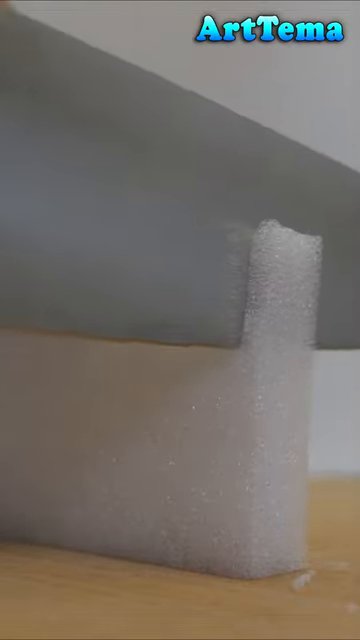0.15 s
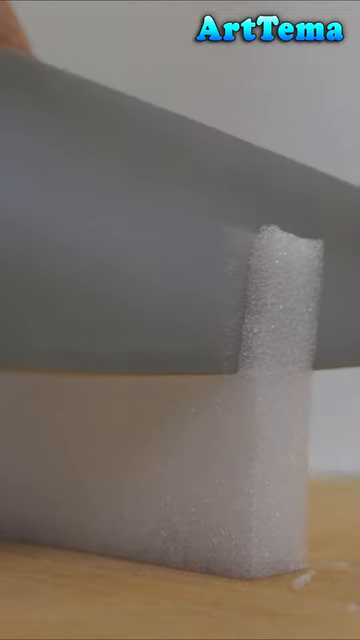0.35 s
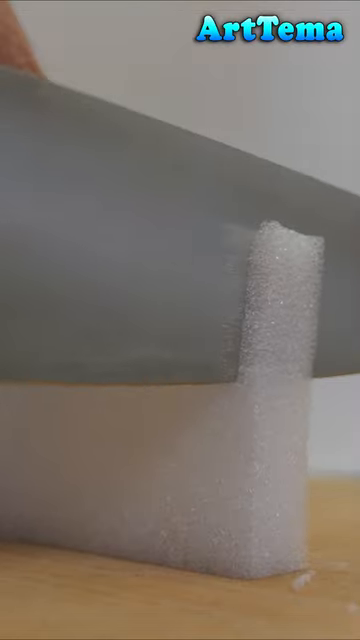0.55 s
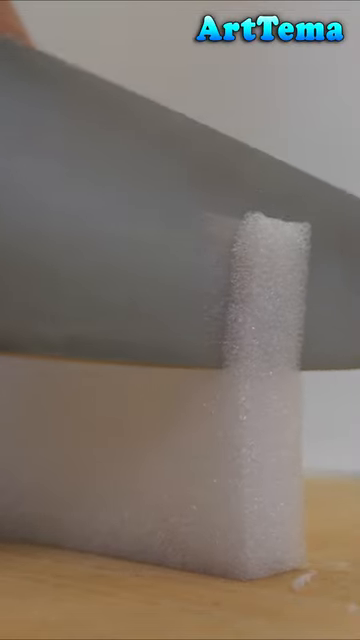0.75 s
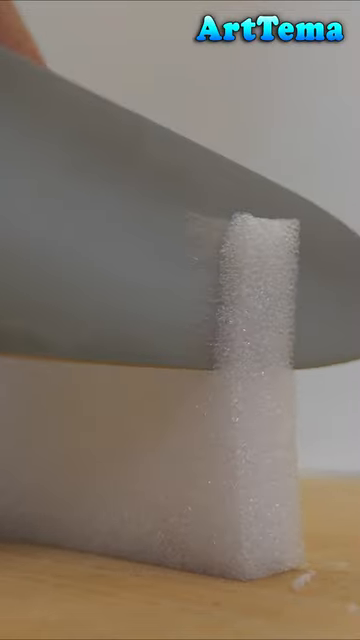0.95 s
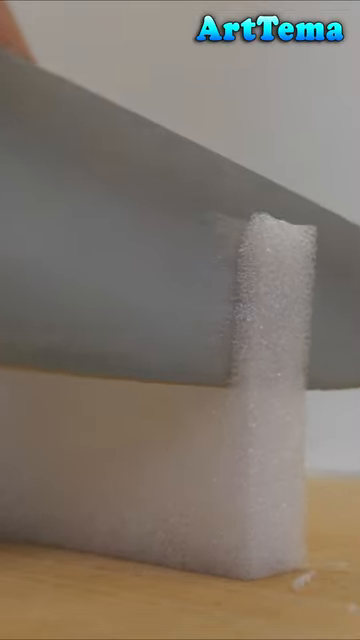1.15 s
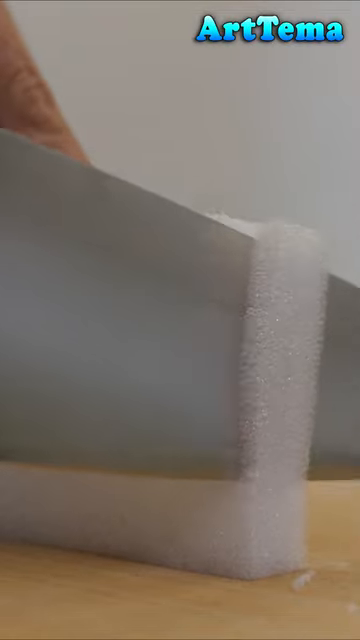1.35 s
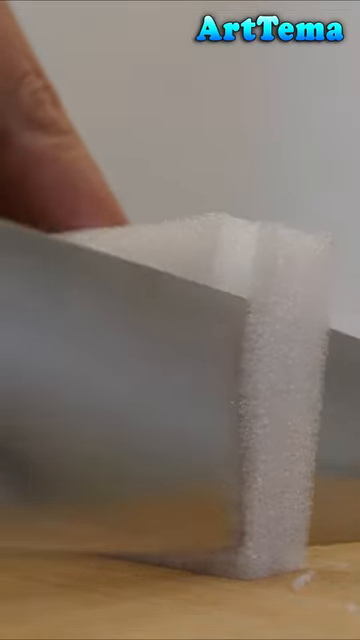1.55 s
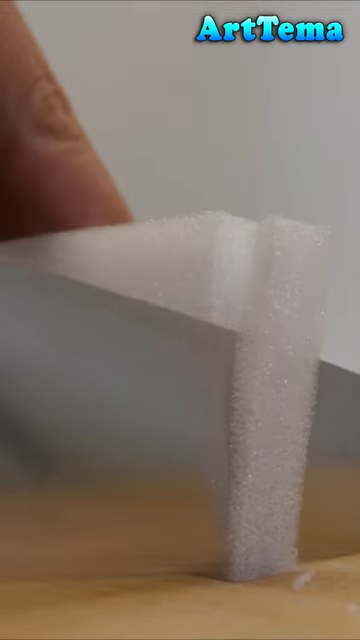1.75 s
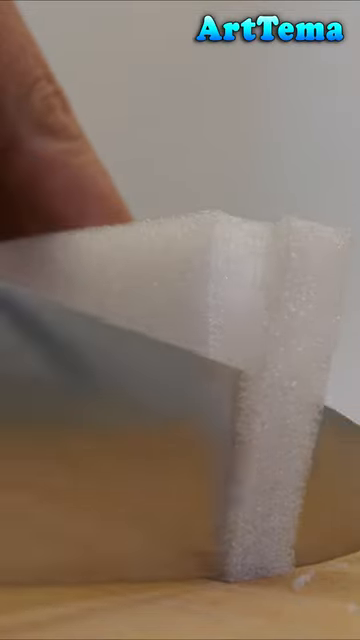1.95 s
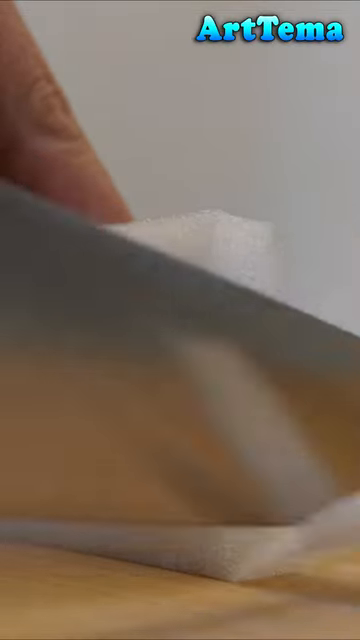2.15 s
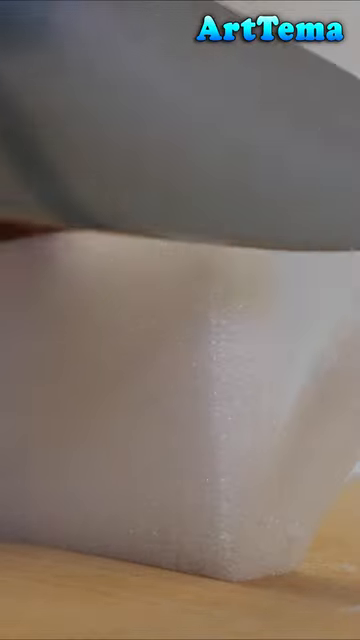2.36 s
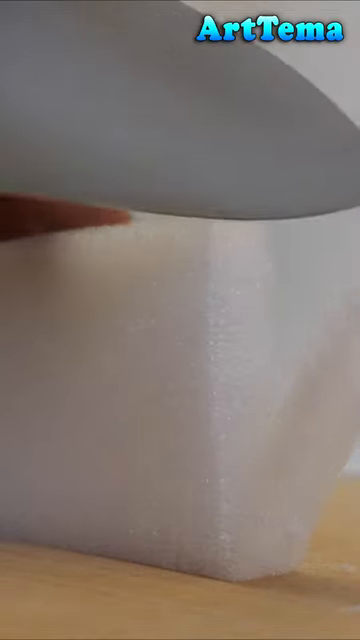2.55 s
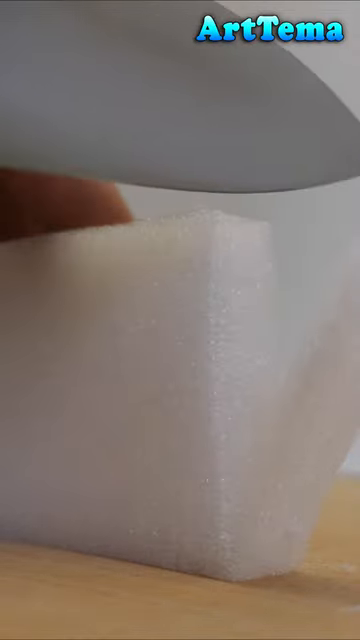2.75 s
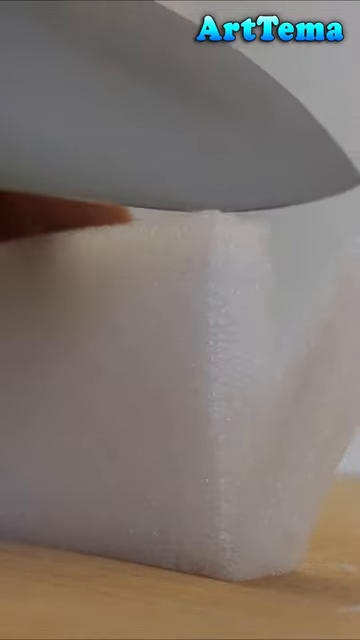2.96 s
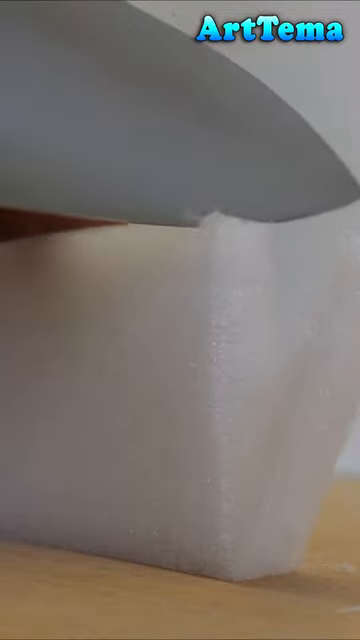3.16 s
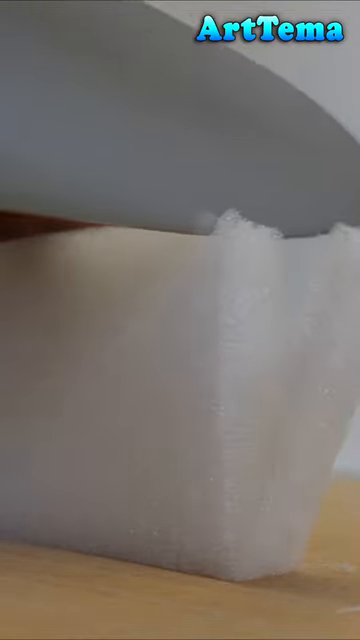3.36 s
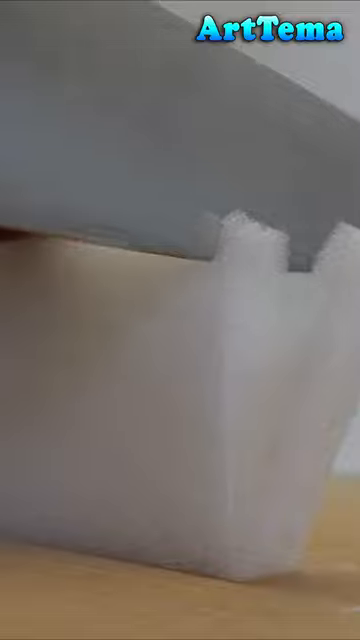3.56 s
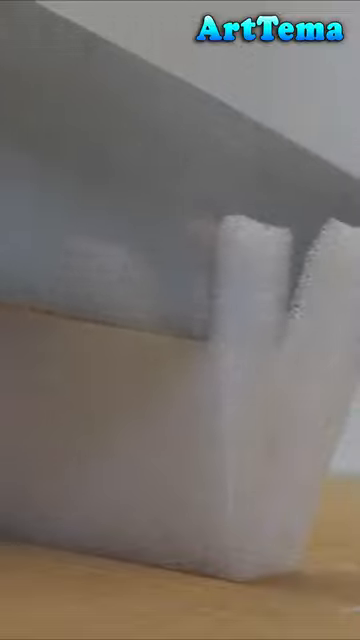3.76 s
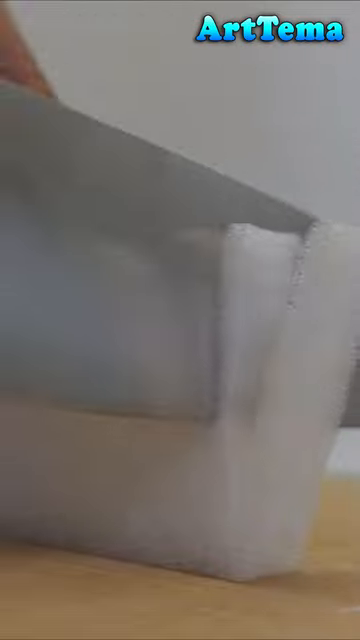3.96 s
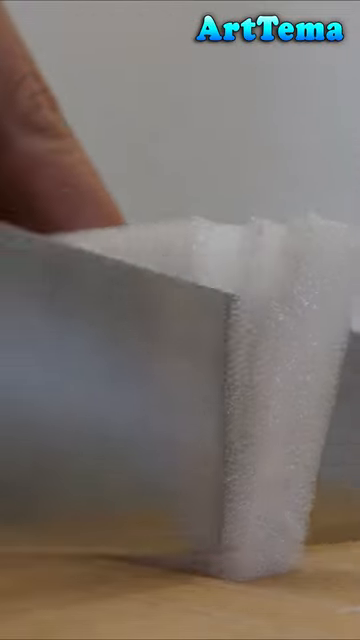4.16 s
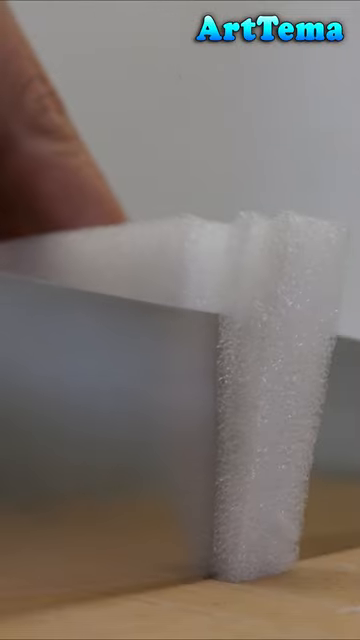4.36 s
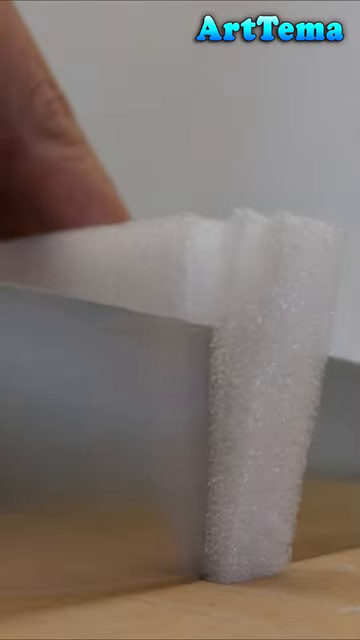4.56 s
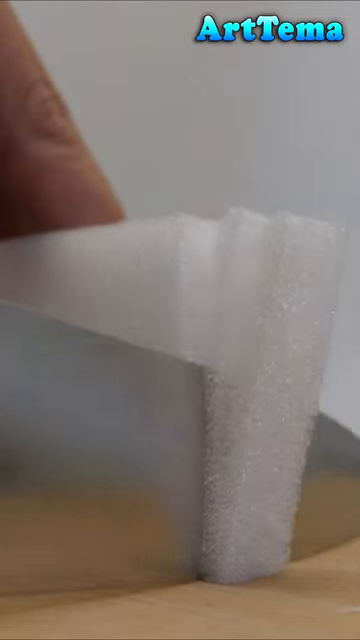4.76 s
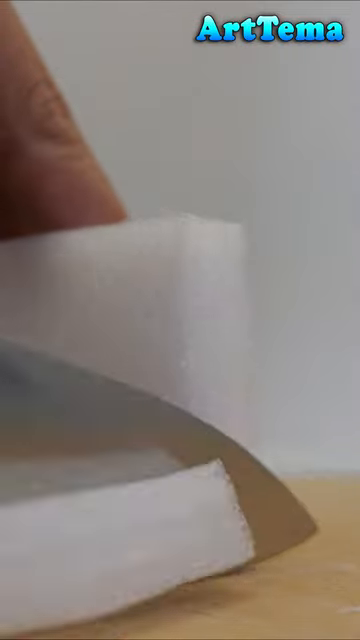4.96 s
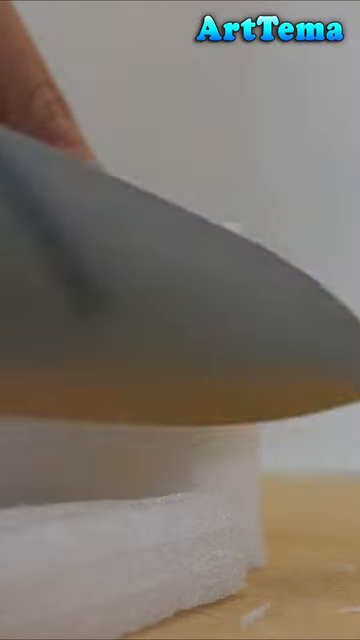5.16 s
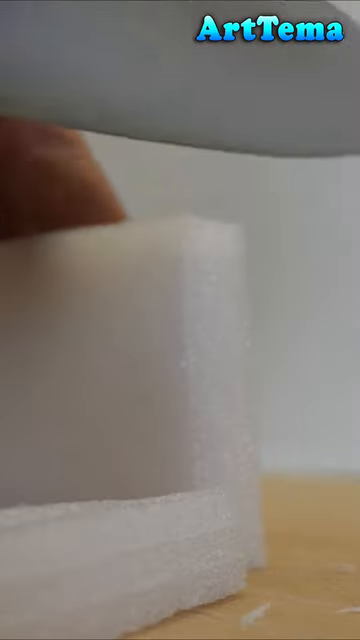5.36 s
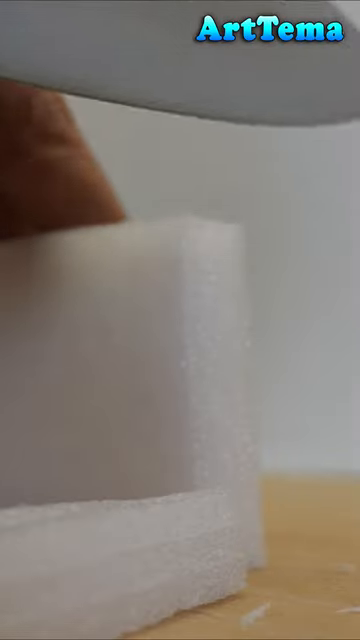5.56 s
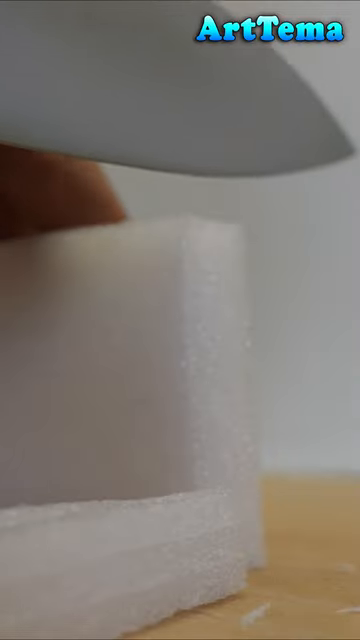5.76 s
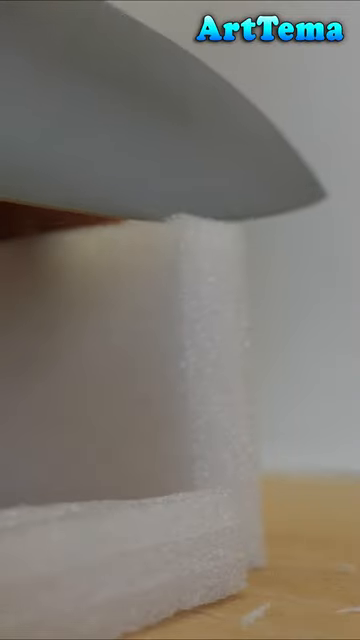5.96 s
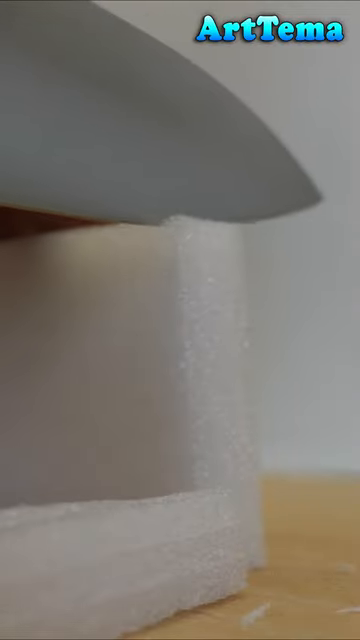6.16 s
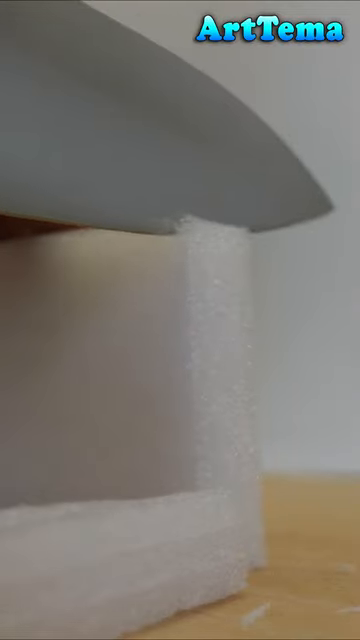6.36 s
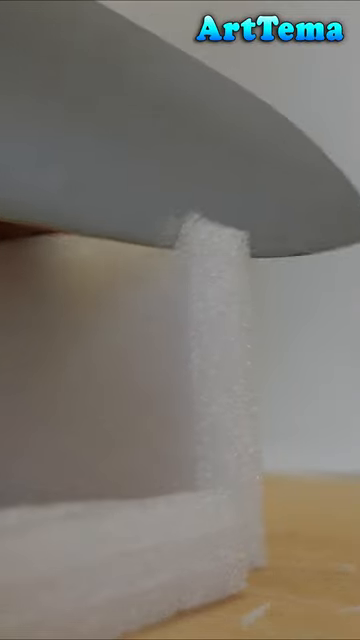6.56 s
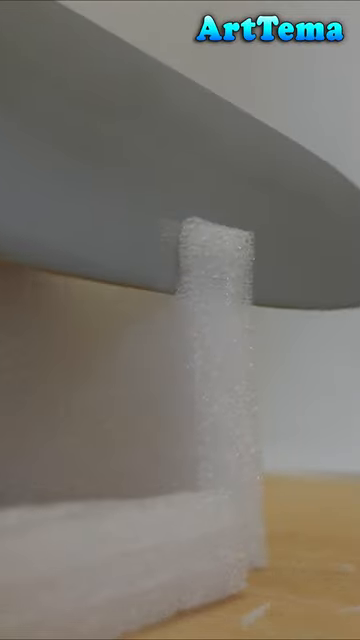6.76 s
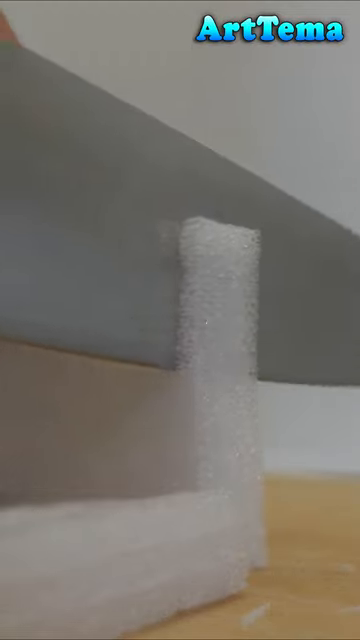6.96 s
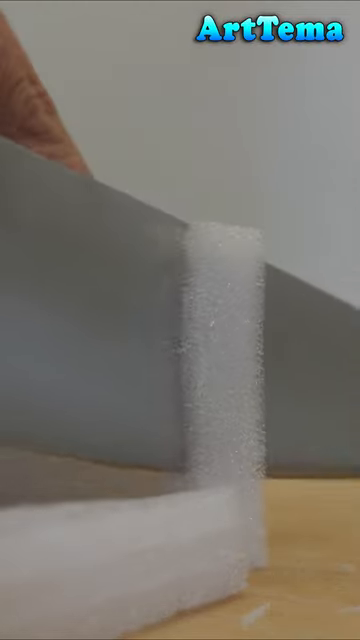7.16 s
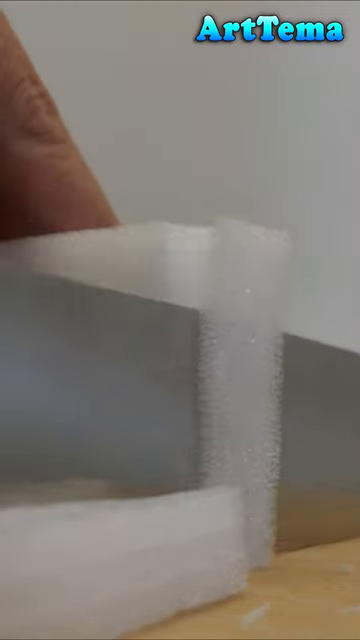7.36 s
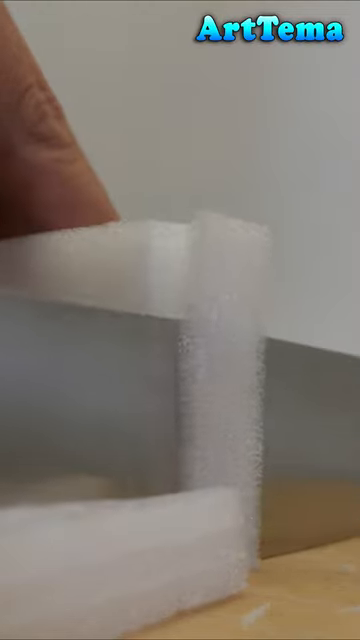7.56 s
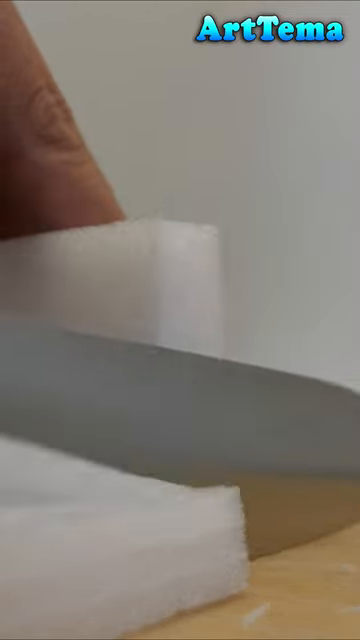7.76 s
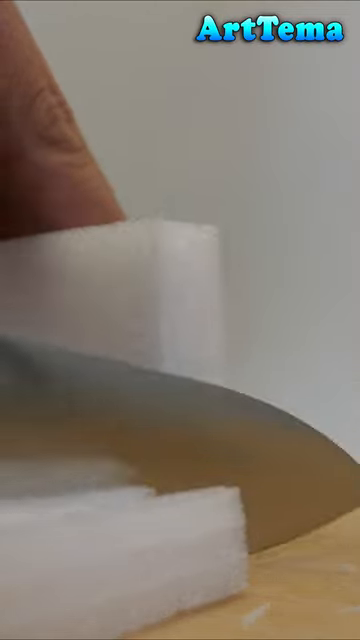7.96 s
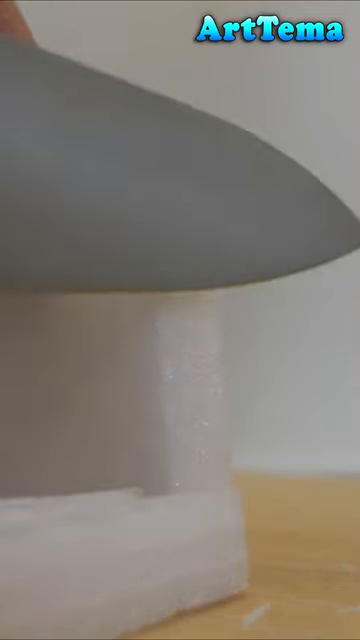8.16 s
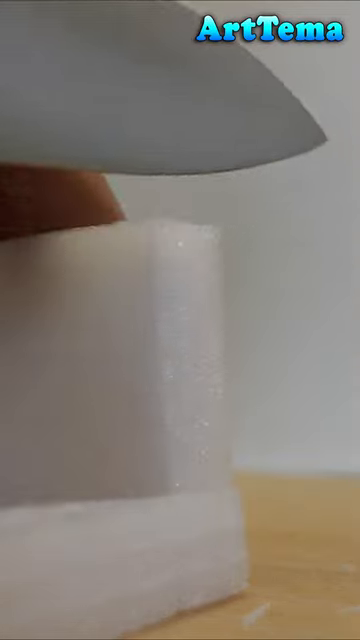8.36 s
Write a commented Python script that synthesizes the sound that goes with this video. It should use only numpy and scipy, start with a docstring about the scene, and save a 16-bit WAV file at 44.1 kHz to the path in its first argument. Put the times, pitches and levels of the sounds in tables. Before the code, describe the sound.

A kitchen knife saws through packing foam three times, each dense, juddering rasp with hollow booming ending in a wooden knock and smooth hissing withdrawal.

```python
"""In a small room, a kitchen knife saws three slices off a block of packing foam on a wooden table, close by.
The edge sticks and slips: bursting foam cells make a dense rasp, and the light block booms near 450 Hz.
Each cut ends with a knock on the wood, a noise thud plus ringing table modes. The blade comes back out with
a smooth hiss of friction noise, some gliding squeaks and a faint ring. Background hiss and hum lie beneath."""
import sys
import numpy as np
from scipy import signal
from scipy.fft import rfft, irfft
from scipy.io import wavfile
from scipy.ndimage import uniform_filter1d

SR = 44100
rng = np.random.default_rng(int(sys.argv[2]) if len(sys.argv) > 2 else 0)


def wrap_up_sound(samples):
    """Save the sound to the file named by the first command line argument, as 16-bit audio."""
    columns = np.atleast_2d(samples).T
    # keep every value between -1 and 1, then stretch to whole-number steps
    tamed = np.clip(columns, -1, 1)
    steps = np.round(tamed * 32767).astype(np.int16)
    wavfile.write(sys.argv[1], SR, steps)


N = 374850
T = np.arange(N) / SR  # time in seconds

# The edge goes down through the block; rasp levels are before lurching and colouring.
# Each row: bites, is fully in, is through and is at rest in seconds, rasp when fully in and
# when through in dB, boom over rasp in dB.
CUTS = [(1.086, 1.279, 1.546, 1.67, -30.5, -23, 4), (3.354, 3.692, 4.24, 4.383, -27, -25.5, 1.5),
        (6.5, 6.649, 7.345, 7.5, -36, -22.5, 2)]
# A faint hiss swells for this many seconds before each cut.
LEAD_S = 0.17
# Level in dB at the start of the faint lead-in, at the bite and at rest, before lurching and colouring.
LEAD_DB, BITE_DB, REST_DB = -73.5, -62, -57
# The boom loses up to this many dB as the edge nears the table; a high power makes the loss come late.
STIFFEN_DB, STIFFEN_POWER = 11, 3.67
# The block bends under the edge and lets go, over and over: typical rate per second, unevenness of the rate.
LURCH_PER_S, LURCH_JITTER = 32, 0.3
# Depth of the lurching in dB at the top of the block and at the table.
LURCH_TOP_DB, LURCH_BOTTOM_DB = 11, 3.5

# The edge slides lightly. Each row: start and end in seconds, rasp in dB before colouring.
SLIDES = [(0.737, 1.053, -44), (7.412, 7.521, -38.5)]
# The level follows the arch of the hand's speed to this power; boom over rasp in dB.
SLIDE_POWER, SLIDE_BOOM_DB = 0.7, -3.5

# The stuck edge jumps ahead; the block booms are relative levels.
# Each row: time in seconds, snap in dB before colouring, block boom in dB.
SLIPS = [(.0014, -20.5, -28.5), (0.148, -22, -34), (0.2142, -19, -29.5), (.329, -21.5, -45),
         (.4438, -25, -43), (.5328, -35.5, -49), (.597, -9, -38), (1.1, -44.5, -55), (1.147, -36, -42),
         (1.178, -33.5, -31.5), (1.279, -28, -18.5), (1.3724, -24.5, -19.5), (1.709, -28.5, -43),
         (2.155, -38, -56), (2.589, -50, -42), (3.0496, -47.5, -44), (3.401, -37, -24), (3.576, -30.5, -27),
         (3.64, -26, -19.5), (3.716, -25, -22.5), (3.9205, -20.5, -18.5), (3.967, -24.5, -40),
         (4.0503, -22.5, -19.5), (4.123, -32.5, -19), (4.1484, -18.5, -17), (4.413, -31.5, -50),
         (6.5527, -36, -39), (6.626, -31, -26), (6.688, -28, -17), (6.729, -26.5, -26), (6.849, -20, -21),
         (6.874, -17, -19.5)]
# Longest decay and the attack of a rip in seconds; a snap this many dB over its boom dies twice as fast.
SLIP_S, RIP_ATTACK_S, SNAPPY_DB = 0.011, 0.0012, 17.5

# Short swelling rubs of the blade's flank. Each row: middle in seconds, rasp in dB before colouring.
RUBS = [(.04, -29.5), (.095, -33.5), (.165, -31), (0.27, -30), (0.382, -34.5), (.457, -34.5), (.575, -41),
        (1.734, -31.5), (2.179, -43), (2.203, -38), (2.256, -48), (3.417, -40), (4.185, -22), (4.21, -25.5),
        (6.659, -28.5), (8.0, -50.5), (8.426, -63)]
# Spread of a rub around its middle in seconds; boom over rasp in dB.
RUB_S, RUB_BOOM_DB = 0.01, -12.5

# Parts of the rasp that change with the place of contact. Each row: lower and upper limit in Hz.
CONTACT_BANDS = [(900, 2230), (2400, 5550)]

# The blade is drawn back out of the cut.
# Each row: starts, is up to speed, slows and is out in seconds, hiss in dB.
DRAWS = [(1.64, 1.755, 1.884, 2.245, -39), (4.383, 4.594, 4.85, 5.122, -35),
         (7.553, 7.71, 7.727, 8.002, -35)]
# Depth in dB and roundness of the rise and the fall of the hiss.
DRAW_FADE_DB, DRAW_CURVE = 24.5, 1.72
# The foam clings until the blade is up to speed and tugs the block: boom over hiss in dB.
CLING_DB = -14.5

# The sliding steel squeaks, with a wavering pitch and an uneven level.
# Each row: start and length in seconds, start and end pitch in Hz, typical peak level in dB.
SQUEAKS = [(4.72, 0.189, 1820, 1730, -47), (4.62, 0.215, 1700, 2010, -52), (7.679, 0.15, 2740, 2830, -44),
           (7.73, .13, 5330, 5420, -49), (7.74, .12, 5580, 5630, -47)]

# The edge lands on the table. Each row: time in seconds, relative level in dB.
KNOCKS = [(1.742, -26.5), (4.238, -19), (7.351, -21.5)]
# The blade leaves the foam. Each row: time in seconds, peak level in dB.
PINGS = [(2.21, -44), (8.02, -56)]

# Resonances of the foam block. Each row: pitch in Hz, width in Hz, relative level in dB.
BLOCK = [(242, 160, -20), (399.3, 62.4, 1.5), (447.4, 69.3, 2.5), (514.3, 41, -1), (647, 13, -7.5)]
# Resonances of the blade while the foam grips it. Each row: pitch in Hz, width in Hz, relative level in dB.
GRIPPED_BLADE = [(1173, 210, -4.5), (1652, 23, 3.5), (2430, 110, -3.5), (2836, 220, 10.5), (3237, 70, 2.5),
                 (3840, 64, -8), (5130, 620, -7), (5420, 24, 1), (6500, 170, 0.5), (6660, 91, 4)]
# Ringing modes of the table. Each row: pitch in Hz, relative level in dB, time to fade by 60 dB in seconds.
TABLE = [(203.4, 4.5, 0.35), (329, -11.5, 0.16), (472, -35, .2), (663, 4, 0.16), (836, -2, 0.11),
         (974, -2.5, 0.078), (1088, -0.5, 0.019), (1488, -10, 0.18), (1639, 2.5, 0.047)]
# Modes of the blade ringing free. Each row: pitch in Hz, relative level in dB, time to fade by 60 dB in seconds.
FREE_BLADE = [(1207, -3, 0.67), (5700, -2, 0.43), (7084, 3, 0.14)]

# Spectrum of the bursting cells. Each row: frequency in Hz, relative level in dB per Hz.
RASP = [(350, -18.5), (600, -7.5), (680, 1), (900, -5), (1200, -7.5), (1950, -7.5), (2600, -4.5),
        (3200, -2.5), (4450, -5.5), (7000, -0.8), (8200, -1.5), (9200, -18), (10000, -10), (13000, -11.5),
        (15200, -15.5)]
# Spectrum of the smooth sliding. Each row: frequency in Hz, relative level in dB per Hz.
HISS = [(150, -25), (250, -4), (444, -3), (607, -8.5), (1060, -3.5), (1280, -11.5), (1730, -4), (2160, -4),
        (4490, -3.5), (6940, 4.5), (9170, -8), (12100, -9), (16000, -11.5)]
# Spectrum of the edge hitting wood. Each row: frequency in Hz, relative level in dB per Hz.
THUD = [(40, -33), (150, 10.5), (330, 14.5), (1200, 2.5), (2800, -6.5), (6000, -38.5)]
# Spectrum of the background noise, with a step down above 3.2 kHz and a dip near 9 kHz.
# Each row: frequency in Hz, relative level in dB per Hz.
BACKGROUND = [(30, -26.5), (65, -29.5), (100, -7), (150, 0.5), (240, -5.5), (520, -7.5), (850, -14.5),
              (2000, -21), (3200, -19), (3900, -27.5), (7700, -29), (9200, -44), (12500, -27), (16000, -33)]

BACKGROUND_DB = -57.5  # typical level of the background hiss, which flutters slightly
HUM_HZ, HUM_DB = 120.9, -61  # pitch and typical rms level of the hum, which wanders
LOW_HZ, TOP_HZ = 53.6, 15700  # the sound is thinned below and cut above


def foam(blade_db=-6.5, rasp_db=0.71, fizz_db=-1.5, table_db=-18):
    """Forces at the edge make a bright rasp, ring the blade and the table, and make the block boom."""
    cut, push = cutting()
    snap, spring = slips()
    rub, drag = rubs()
    brief = along_edge(rub) + along_edge(snap, width_db=-4)
    edge = shifting(along_edge(cut)) + brief
    rasp = undb(rasp_db) * through(edge, colour(RASP))
    blade = undb(blade_db) * through(edge, body(GRIPPED_BLADE))
    # snaps and brief contacts keep more top than tearing deep inside the foam
    top_only = signal.butter(6, 11800, "high", fs=SR, output="sos")
    fizz = undb(fizz_db) * signal.sosfilt(top_only, brief)
    # tiny quick forces favour the table's higher modes
    wood = undb(table_db) * through(cut, np.diff(ring(TABLE)))
    boom = through(push + drag, body(BLOCK)) + spring
    return rasp + blade + fizz + wood + boom


def cutting(tear_from_db=-44, tear_range_db=12):
    """Light strokes slide; harder ones judder and burst cells. Returns (rasp, force on the block)."""
    rasp, boom = pressing()
    rasp_level_db = 20 * np.log10(rasp + 1e-9)
    share = np.clip((rasp_level_db - tear_from_db) / tear_range_db, 0, 0.95)
    tear = unit(judder() * cells(per_s=5000, spread_db=2.5))
    slide = rng.standard_normal(N)
    force = np.sqrt(share) * tear + np.sqrt(1 - share) * slide
    return force * rasp, force * boom


def pressing():
    """Rasp swells with bite and depth; the shrinking uncut foam booms less. Returns (rasp, boom) gains."""
    rasp = sum(undb(db) * arch(start, end) ** SLIDE_POWER for start, end, db in SLIDES)
    boom = rasp * undb(SLIDE_BOOM_DB)
    for bites, inside, out, rests, inside_db, deep_db, boom_db in CUTS:
        depth = progress(bites, out)
        lurch = lurching(depth)
        times = [bites - LEAD_S, bites, inside, out, rests]
        levels = [LEAD_DB, BITE_DB, inside_db, deep_db, REST_DB]
        gain = lurch * stroke(times, levels)
        rasp = rasp + gain
        # the block itself feels the lurching twice as strongly (in dB) as the cells at the edge
        boom = boom + gain * lurch * undb(boom_db - STIFFEN_DB * depth ** STIFFEN_POWER)
    return rasp, boom


def lurching(depth):
    """Gain of the block catching and letting go; the thinner the uncut foam, the less it bends."""
    rate = LURCH_PER_S * np.exp(LURCH_JITTER * walk(40))
    cycle = np.cumsum(rate) / SR % 1
    swing_db = LURCH_TOP_DB + (LURCH_BOTTOM_DB - LURCH_TOP_DB) * depth
    sawtooth = undb(swing_db * (0.4135 - cycle))
    return uniform_filter1d(sawtooth, size=100)  # rounds off the jumps


def judder(per_s=90, scatter_db=2, slip_s=0.0054, steady=0.72):
    """Stick and slip at uneven intervals: the tearing flares at each slip and dies down; rms 1."""
    gaps = rng.gamma(3, 1 / 3, 2000)
    sizes = rng.uniform(-2, 2, 2000)
    at = (np.cumsum(gaps) / per_s * SR).astype(int)
    kicks = np.zeros(N)
    kicks[at[at < N]] = undb(scatter_db * sizes[at < N])
    flares = signal.lfilter([1], [1, -np.exp(-1 / (slip_s * SR))], kicks)
    return unit(steady + flares)


def cells(per_s, spread_db):
    """Clicks of bursting cells at random moments, most small and a few large; rms 1."""
    size = undb(spread_db * np.minimum(rng.exponential(size=N), 4))
    bursts = rng.random(N) < per_s / SR
    return unit(bursts * size * rng.choice([-1, 1], N))


def slips(boom_db=2):
    """A jump rips cells and the block springs back; more spring, longer rip. Returns (rasp, boom)."""
    ripping, boom = np.zeros(N), np.zeros(N)
    spring = body(BLOCK)
    spring = spring / np.abs(spring).max()
    t = T[:SR // 4]
    for s, db, block_db in SLIPS:
        # a snap that is loud against its boom dies sooner
        decay = SLIP_S / (1 + undb(db - block_db - SNAPPY_DB))
        rip = np.exp(-t / decay) * (1 - np.exp(-t / RIP_ATTACK_S))
        add(ripping, s, undb(db) * rip)
        add(boom, s, undb(block_db + boom_db) * spring)
    return ripping * cells(per_s=17000, spread_db=1.0), boom


def rubs():
    """Steel drags briefly over the foam. Returns (rasp, force on the block)."""
    swells = sum(undb(db) * np.exp(-0.5 * ((T - s) / RUB_S) ** 2) for s, db in RUBS)
    rasp = swells * cells(per_s=7000, spread_db=1.0)
    return rasp, rasp * undb(RUB_BOOM_DB)


def along_edge(force, width_db=-3, apart_hz=7000):
    """Grains of force act at different places on the long blade, so the treble differs left and right."""
    side = undb(width_db) * force * rng.choice([-1, 1], N)
    return spread(force, side, apart_hz)


def shifting(force, patchy_db=2.5, per_s=30):
    """The place of contact shifts, so the middle of the rasp keeps changing colour at random."""
    out = force
    for band in CONTACT_BANDS:
        band_filter = signal.butter(2, band, "band", fs=SR, output="sos")
        part = signal.sosfiltfilt(band_filter, force)
        out = out + (undb(patchy_db * walk(per_s)) - 1) * part
    return out


def drawing(blade_db=-14.0, release_s=0.014):
    """Steel slides out: fine friction that also stirs the blade and at first tugs the block."""
    speed, tug = 0, 0
    for starts, fast, slows, out, db in DRAWS:
        slack = 1 - progress(starts, fast) + progress(slows, out)
        release = np.exp(-np.maximum(T - out, 0) / release_s)
        speed = speed + undb(db - DRAW_FADE_DB * slack ** DRAW_CURVE) * (T > starts) * release
        tug = tug + undb(db + CLING_DB) * arch(starts, fast) ** 2
    hiss = through(along_edge(rng.standard_normal(N), width_db=-3), colour(HISS))
    boom = through(tug * rng.standard_normal(N), body(BLOCK))
    return speed * (hiss + undb(blade_db) * singing_blade()) + boom


def singing_blade(freed=1.05, drift=0.024, patchy_db=1.5, slope_db=-4.5):
    """Held less tightly the blade rings higher; each resonance wanders in pitch and level; rms 1."""
    out = 0
    for hz, width, db in GRIPPED_BLADE:
        phase = 2 * np.pi * np.cumsum(hz * (freed + drift * walk(6.6))) / SR
        # two unrelated stirrings, for the middle and the side of the stereo image
        stirring = np.array([walk(4 * width), walk(4 * width)])
        # smooth sliding feeds the low bending modes best: loss per octave above the second resonance
        favour = slope_db * max(np.log2(hz / GRIPPED_BLADE[1][0]), 0)
        level = undb(db + favour + patchy_db * walk(8.7))
        out = out + level * stirring * np.cos(phase)
    return unit(spread(*out, apart_hz=3500))


def squeaks(waver=0.012, patchy_db=3):
    """For a moment the friction locks onto one bending mode of the blade, which glides and wavers."""
    out = 0
    for s, length, from_hz, to_hz, db in SQUEAKS:
        glide = from_hz + (to_hz - from_hz) * progress(s, s + length)
        hz = glide * (1 + waver * walk(250) + waver * walk(30))
        level = arch(s, s + length) * undb(db + patchy_db * walk(140))
        out = out + level * np.sin(2 * np.pi * np.cumsum(hz) / SR)
    return out


def knocks(ring_db=1, thud_db=-2, thud_s=0.0094, settle_db=-15, settle_s=0.052):
    """The edge breaks through and hits the wood, then grinds on it for a moment."""
    wood, contact = np.zeros(N), np.zeros(N)
    t = T[:SR]
    for s, db in KNOCKS:
        add(wood, s, undb(db + ring_db) * ring(TABLE))
        thud = undb(db + thud_db) * np.exp(-t / thud_s)
        grind = undb(db + settle_db) * np.exp(-t / settle_s)
        add(contact, s, thud + grind)
    return wood + through(contact * rng.standard_normal(N), colour(THUD))


def blade_ping():
    """Leaving the foam, the blade rings faintly in its free modes."""
    out = np.zeros(N)
    for s, db in PINGS:
        add(out, s, undb(db) * ring(FREE_BLADE))
    return out


def room(x, t60=0.24, wet_db=-5, boom_hz=800):
    """Direct sound and the short tail of the room, made of fading noise."""
    t = T[:SR // 2]
    fade = np.exp(-np.log(1000) * t / t60) * (1 - np.exp(-t / 0.0013))
    tail = rng.standard_normal((2, len(t))) * fade
    tail = spread(*tail / np.linalg.norm(tail[0]), apart_hz=450)
    # the block's boom reaches the microphones mostly directly
    tail = signal.sosfilt(signal.butter(1, boom_hz, "high", fs=SR, output="sos"), tail)
    return x + undb(wet_db) * signal.fftconvolve(x, tail, axes=1)[:, :N]


def background(flutter_db=-0.3):
    """Quiet background hiss as coloured noise, and the mains hum of an appliance as one wandering sine."""
    mid, side = through(rng.standard_normal((2, N)), colour(BACKGROUND))
    level = undb(BACKGROUND_DB + flutter_db * walk(1.5))
    hiss = unit(spread(mid, side, apart_hz=600)) * level
    hum = undb(HUM_DB + walk(3.6)) * np.sqrt(2) * np.sin(2 * np.pi * HUM_HZ * T)
    return hiss + hum


def undb(db):
    """Decibels to gain."""
    return 10 ** (np.asarray(db) / 20)


def unit(x):
    """Scale to rms 1."""
    return x / np.sqrt(np.mean(x ** 2))


def through(x, response):
    """Pass a force or sound (one or two channels) through a response scaled to unit energy."""
    return np.apply_along_axis(signal.fftconvolve, -1, x, response / np.linalg.norm(response))[..., :N]


def colour(points, size=4096):
    """Response with the given spectrum that starts at once (minimum phase, by folding the cepstrum)."""
    hz, db = np.transpose(points)
    bins = np.fft.rfftfreq(size, 1 / SR) + 1
    log_gain = np.log(undb(np.interp(np.log(bins), np.log(hz), db)))
    cepstrum = irfft(log_gain)
    cepstrum[1:size // 2] *= 2
    cepstrum[size // 2 + 1:] = 0
    return irfft(np.exp(rfft(cepstrum, size)))


def body(resonances, size=4096):
    """Response of damped resonances; neighbours swing in opposite directions."""
    t = T[:size]
    motion = 0
    for k, (hz, width, db) in enumerate(resonances):
        swing = np.exp(-np.pi * width * t) * np.sin(2 * np.pi * hz * t)
        motion = motion + (-1) ** k * undb(db) * width / hz * swing
    return np.diff(motion)


def ring(modes):
    """Modes struck once, each dying away at its own pace; peak 1."""
    t = T[:SR]
    y = 0
    for k, (hz, db, t60) in enumerate(modes):
        y = y + (-1) ** k * undb(db - 60 * t / t60) * np.sin(2 * np.pi * hz * t)
    return y / np.abs(y).max()


def spread(mid, side, apart_hz):
    """Two close microphones hear the same bass but different treble of a diffuse sound."""
    treble_only = signal.butter(1, min(apart_hz, SR / 3), "high", fs=SR, output="sos")
    side = signal.sosfilt(treble_only, side)
    return np.array([mid + side, mid - side]) / np.sqrt(2)


def add(track, s, sound):
    """Mix a sound into a track at time s."""
    start = max(int(s * SR), 0)
    track[start:start + len(sound)] += sound[:N - start]


def walk(rate):
    """Random wander of rms 1 along straight lines between random points, rate points a second."""
    return unit(np.interp(T * rate, np.arange(N), rng.standard_normal(N)))


def stroke(times, levels):
    """Gain that passes through the given dB at the given times; silent outside."""
    return undb(np.interp(T, times, levels)) * (T > times[0]) * (T < times[-1])


def progress(start, end):
    """0 before the start, rising evenly to 1 at the end."""
    return np.clip((T - start) / (end - start), 0, 1)


def arch(start, end):
    """Half a sine: a movement that speeds up and stops again."""
    return np.abs(np.sin(np.pi * progress(start, end)))


def scene():
    """Knife, foam and table in the room, over the quiet background."""
    return room(foam() + drawing() + squeaks() + knocks() + blade_ping()) + background()


def record(dry):
    """The recorder thins the deep bass and cuts the top."""
    thinned = signal.sosfilt(signal.butter(2, LOW_HZ, "high", fs=SR, output="sos"), dry)
    return signal.sosfilt(signal.ellip(8, 0.2, 80, TOP_HZ, fs=SR, output="sos"), thinned)


dry = scene()
out = record(dry)
wrap_up_sound(out)
```